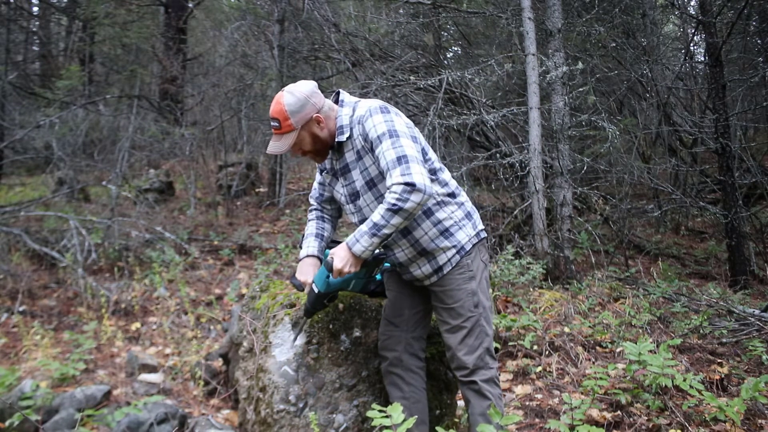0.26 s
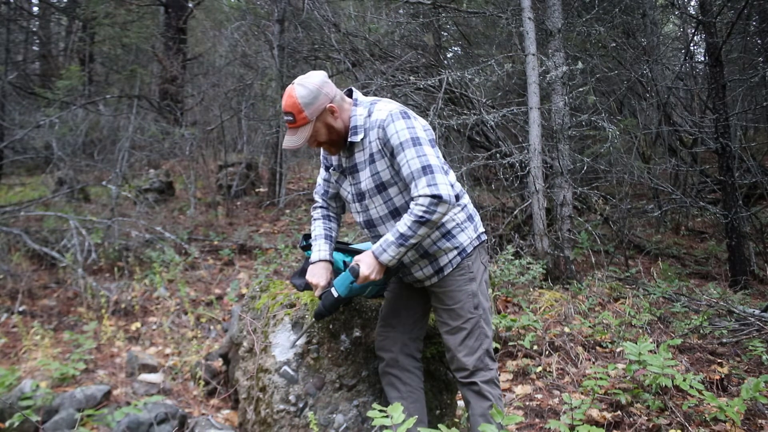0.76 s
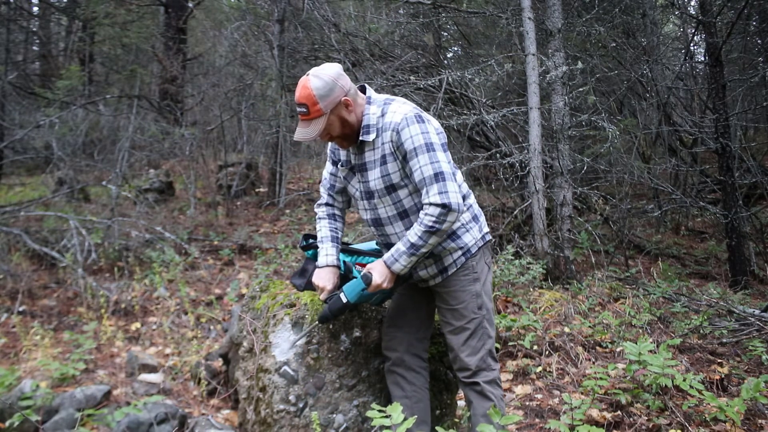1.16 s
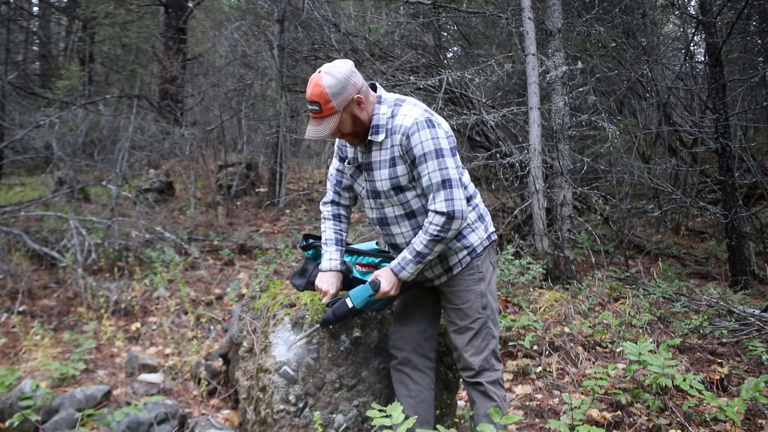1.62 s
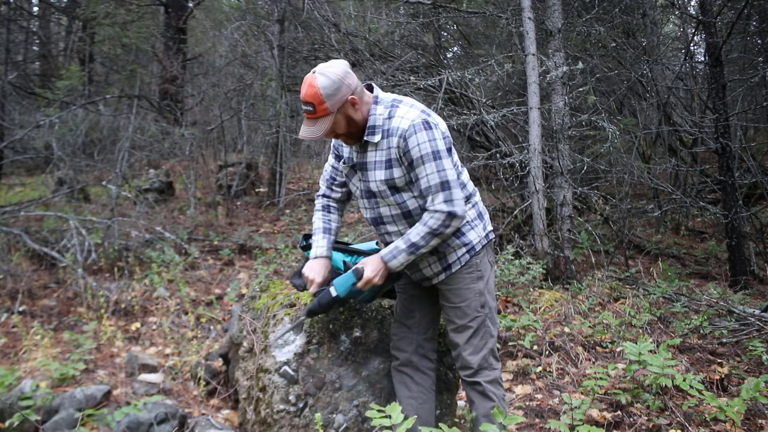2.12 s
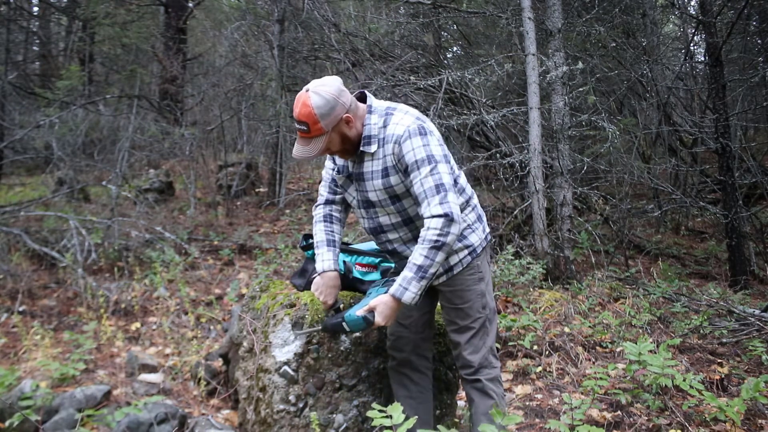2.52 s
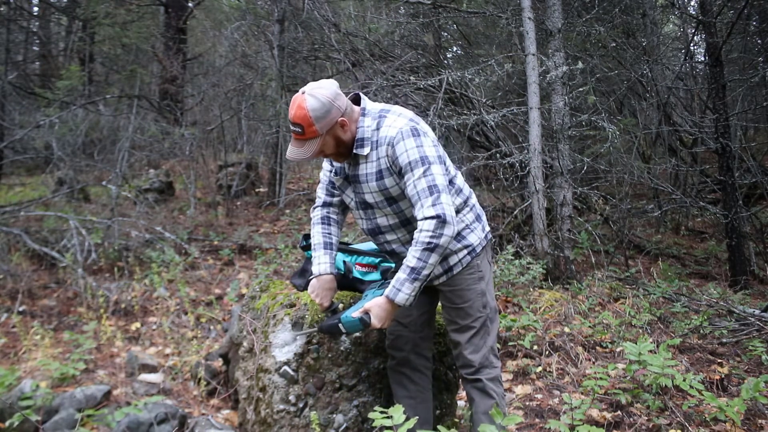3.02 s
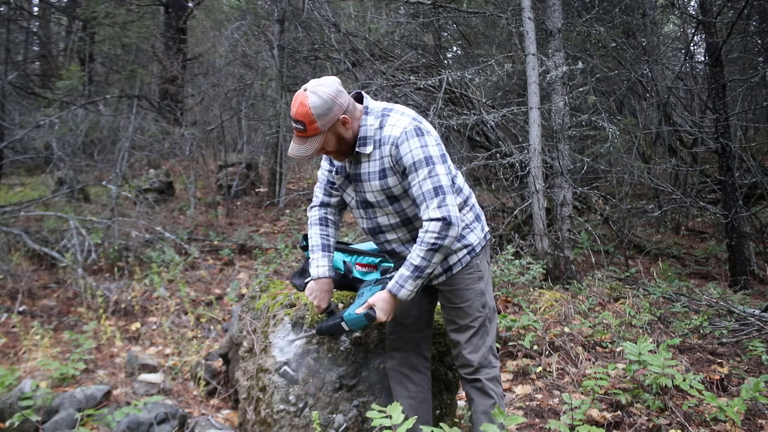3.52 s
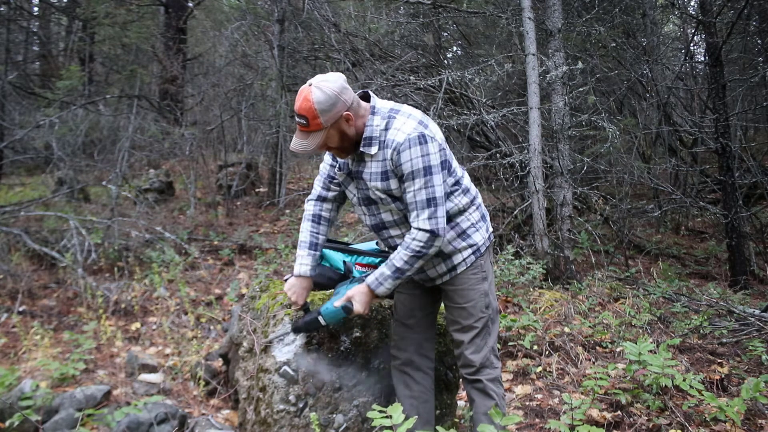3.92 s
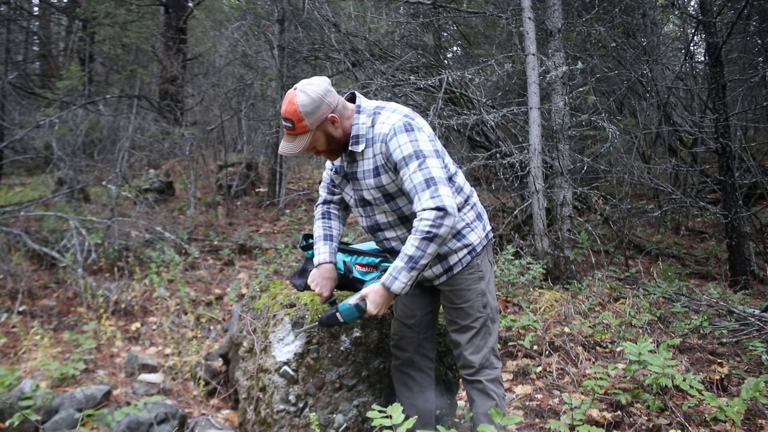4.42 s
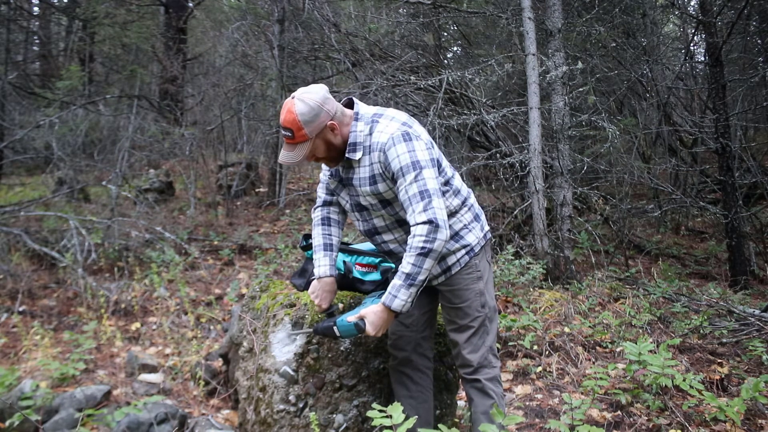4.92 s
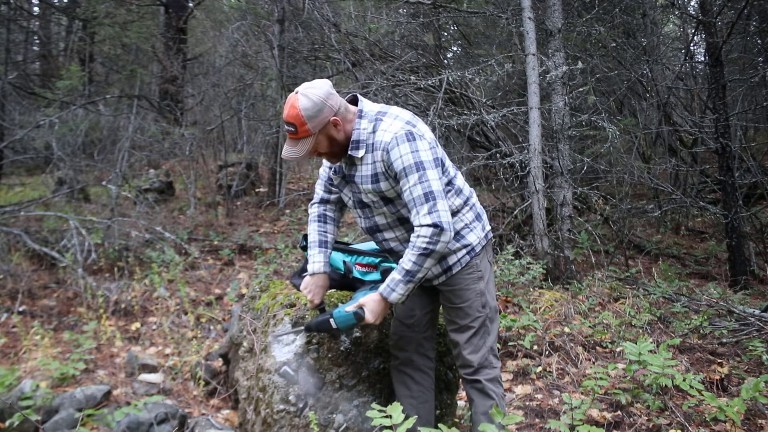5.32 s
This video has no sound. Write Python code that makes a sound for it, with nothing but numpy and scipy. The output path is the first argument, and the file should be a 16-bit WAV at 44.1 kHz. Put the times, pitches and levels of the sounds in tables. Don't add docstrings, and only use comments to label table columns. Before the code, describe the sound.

A cordless rotary hammer chisels old concrete outdoors in three rattling bursts, with chips pattering onto dry leaves in the pauses.

```python
import sys
import numpy as np
from scipy import signal
from scipy.io import wavfile
from scipy.ndimage import uniform_filter1d

SR = 44100
rng = np.random.default_rng(int(sys.argv[2]) if len(sys.argv) > 2 else 0)


def amplitude_ratio(level_db):
    exponent = np.asarray(level_db, float) / 20
    return 10 ** exponent


def put_to_file(sound):
    columns = np.atleast_2d(sound).T
    safe = np.clip(columns, -1, 1)
    whole_steps = np.round(safe * 32767)
    wavfile.write(sys.argv[1], SR, whole_steps.astype(np.int16))


N = 245195

# (centre [Hz], width [Hz], level [dB], extra fade at low speed [dB per dB])
HOUSING_MODES = [(1720, 420, 1, 0), (2550, 650, -3.5, .6), (3650, 600, 1.5, .6)]
# (frequency [Hz], level [dB per Hz])
BLOW_COLOUR = [(80, -106), (300, -17), (800, 7.5), (1500, 4), (3300, 9), (3950, 6), (4500, 1), (9500, -7),
               (11200, -4.5), (14500, -5.5), (16000, -12.5)]
# (frequency [Hz], level [dB], decay time T60 [s])
BIT_MODES = [(12850, -1, .019), (12550, -4, .016), (12150, -9, .014), (11200, -6, .018), (14300, -7, .012),
             (8000, -12, .009)]


def evened(x):
    return x / np.sqrt(np.mean(x ** 2) + 1e-20)


def colour(x, points):
    f, db = np.transpose(points)
    hz = abs(np.fft.fftfreq(4096, 1 / SR))
    log_gain = np.log(amplitude_ratio(np.interp(np.log(hz + 1), np.log(f + 1), db)))
    taps = np.fft.ifft(np.exp(np.conj(signal.hilbert(log_gain)))).real[:2048]
    return signal.oaconvolve(x, taps)[:len(x)]


def band(x, lo_hz, hi_hz):
    return signal.sosfilt(signal.butter(2, [lo_hz, hi_hz], "band", fs=SR, output="sos"), x)


def split(low, high):
    lower, upper = (signal.butter(4, 4500, kind, fs=SR, output="sos") for kind in ("low", "high"))
    return signal.sosfilt(lower, low) + signal.sosfilt(upper, high)


def resonate(x, hz, width):
    turn = np.exp(2j * np.pi * np.cumsum(hz) / SR)
    r = np.exp(-np.pi * width / SR)
    return 2 * (turn * signal.lfilter([1 - r], [1, -r], x / turn)).real


def wander(count, size, span):
    noise = rng.standard_normal((count, size))
    return evened(uniform_filter1d(uniform_filter1d(noise, span), span))


def add(mix, at, sound):
    part = mix[at:at + len(sound)]
    part += sound[:len(part)]


def beats(turns, count, jitter):
    at = np.flatnonzero(np.diff(np.floor(turns * count)) > 0)
    return np.clip(at + jitter * SR * rng.standard_normal(len(at)), 0, N - 1).astype(int)


def knocks(at, t60, fresh, spread_db, drift, spike):
    t, out = np.arange(900) / SR, np.zeros(N)
    shapes = wander(len(t), len(at), drift).T
    shapes = np.sqrt(1 - fresh) * shapes + np.sqrt(fresh) * rng.standard_normal(shapes.shape)
    shapes[:, 28] -= spike
    sizes = amplitude_ratio(spread_db * rng.standard_normal(len(at)))
    envelope = amplitude_ratio(-60 * t / t60) * np.minimum(t / .0008, 1)
    for i, size, shape in zip(at, sizes, shapes):
        add(out, i, size * shape * envelope)
    return evened(out)


def hammer():
    # (time [s], push [dB], blow share [dB], freedom of the bit to sing [dB])
    grip = [
        [(0.0, 4.5, -2.5, 10), (.1, 1.5, -2, 8.5), (.28, -0.5, 0.5, 11.5), (.35, 0, -2.5, 8),
         (.54, 2, -2.5, 12), (.82, -2, -2, -7), (1.07, -2.5, -6, -2), (1.17, -1, -5.5, 7), (1.3, 1.5, -2, 0),
         (1.5, 0, -1.5, -12), (1.74, 1.8, 2, -3), (1.83, 1, -8, 0), (1.95, 1.9, -6, 0)],
        [(2.82, -1.5, 0, 4), (2.842, -4.5, 0, 0), (2.853, 0, 0, 0), (2.88, -4.5, 0, 0), (2.89, 3, 0, 0),
         (2.92, 1, 0, 0), (2.98, -2.5, 0, 0), (3.01, 2.5, 0, 0), (3.1, 1.4, -5, 11), (3.44, 2.8, 0.5, 9),
         (3.5, 0.5, -2, 8), (3.545, 4.5, 0, 5), (3.58, 2.5, 3.5, 4), (3.79, 1, -9, 13), (3.82, -0.1, -5, 4)],
        [(4.48, -1, 4, 0), (4.51, 3, -3, 0), (4.535, -3, 0, 0), (4.55, 0, 3, 0), (4.6, -1, -2, 0),
         (4.7, -0.5, 8, 0), (4.78, 0, -1, 4), (4.83, 3.5, -1, 14), (4.92, -0.5, -2, 9), (4.954, 3, -3, 5),
         (4.985, 0.5, -2.5, 9), (5.19, 3.4, 2.5, 9), (5.31, 3.5, -6, 12), (5.33, 1.7, -1, -6)],
    ]
    t = np.arange(N) / SR
    free, speed_db, load_db, contact_db, lag, loose = trigger(t)
    turns = 82.03 * t - lag
    s, *columns = np.transpose(np.concatenate(grip))
    push_db, share_db, sing_db = (np.interp(t, s, c) for c in columns)
    at = beats(turns, count=1, jitter=.00003)
    seated = contact_db > -6

    clear_db, damp_db = 3.5 * free, -5.5 * (1 - free) * seated
    out = rattle(turns, speed_db + load_db + push_db - 3.5, clear_db, damp_db)
    out = out * amplitude_ratio(-3 * np.maximum(seated, free / 2) * np.sin(np.pi * (turns - .2)) ** 2)

    parts = amplitude_ratio(-25.5 + contact_db + share_db) * blows(at, t)
    parts = parts + amplitude_ratio(-49.5 + 1.5 * contact_db + sing_db) * bit_ring(at)
    shudder_db = -34.5 - 4.5 * free + .58 * (contact_db + 17 * free) + push_db
    parts = parts + amplitude_ratio(shudder_db) * shudder(turns, loose)
    return out + amplitude_ratio(1.4 * speed_db) * parts


def trigger(t):
    # (motor at full speed [s], bit bites [s], bit slips off [s], motor stops [s])
    bursts = [
        (-.5, -.3, 1.78, 2.005),
        (2.872, 3.005, 3.835, 3.939),
        (4.548, 4.78, 5.3, 5.478),
    ]
    crank = [
        (.465, 0, .1, .2),
        (.875, .02, 1, .55),
        (.775, .225, .12, .33),
    ]
    burst_rattle = [-23.5, -23, -23]
    full, bite, slip, stop = np.transpose(bursts)
    which = np.searchsorted((stop[:-1] + full[1:]) / 2, t)
    full, bite, slip, stop = (t - s[which] for s in (full, bite, slip, stop))
    phase, stall, free, seated = np.transpose(crank)[:, which]
    bitten = np.clip(bite / .0105, 0, 1)
    off = np.maximum(slip, 0)

    spin_up_db_per_s, brake_db_per_s2 = 361, 26000
    speed_db = spin_up_db_per_s * np.minimum(full, 0) - brake_db_per_s2 * np.clip(stop, 0, 1) ** 2
    load_db = np.take(burst_rattle, which) + 4 * np.exp(-abs(full) / .23)
    load_db = load_db + 3.5 * (1 - bitten) - 20 * off
    contact_db = -17 * (1 - bitten) + np.maximum(-179 * off, -26)

    race_turns, race_s, stall_s, coast_turns_per_s = .47, .056, .07, .9
    race = np.minimum(race_turns * np.exp(-np.maximum(full, -1) / race_s), 2 * race_turns)
    lag = phase + race + stall * (1 - np.exp(-np.maximum(bite, 0) / stall_s)) - coast_turns_per_s * off
    settling = np.maximum(1 - bite / .09, seated)
    loose = np.where((slip > 0) | (full < 0), 1, np.where(bite < 0, free, settling))
    lag, loose = (uniform_filter1d(x, size=1200) for x in (lag, loose))
    return 1 - bitten, speed_db, load_db, contact_db, lag, loose


def blows(at, t):
    # (time [s], lower ring [Hz],
    # upper ring [Hz], top ring [Hz], lower level [dB], upper level [dB], top level [dB])
    seat_rings = [
        [(0, 2120, 3780, 7860, -21, 9.5, 4), (.13, 1980, 3620, 7800, -9, 11, 9),
         (.22, 1930, 3570, 6300, -9, 9.5, -13), (.42, 2070, 3870, 5430, -3, 8, 14),
         (.68, 2280, 3720, 5500, -1, 9, 11), (.76, 2100, 3250, 8200, 0, 7, 11),
         (.88, 2230, 3420, 8270, 1, 5.5, 12), (1.0, 2130, 3500, 6240, 5, 9.5, 11),
         (1.22, 2160, 3240, 6050, -1, 11, 10), (1.3, 2100, 3180, 8400, -5, 1, 8),
         (1.45, 2240, 3160, 8300, 0, 2, 6), (1.52, 3200, 3650, 6000, -21, 6, -8),
         (1.78, 3200, 3700, 7800, -19, 0.5, -10)],
        [(3.0, 2470, 3630, 6030, 3, -13, -3), (3.08, 2450, 3530, 6170, 7, 1, -12),
         (3.19, 2330, 3800, 6840, -1, -5, 0), (3.32, 2200, 3620, 7850, -4.5, -5, -6),
         (3.6, 2330, 3940, 7900, -12, -0.5, 11), (3.75, 2140, 3750, 6200, -6, 3.5, -14),
         (3.9, 2300, 3630, 6240, 14, -21, -7)],
        [(4.78, 2420, 3600, 6300, 8.5, -13, -6), (4.84, 2420, 3630, 5900, 3, 1, -10),
         (4.99, 2300, 3800, 7900, 2.5, 0, 6), (5.06, 2460, 3820, 7900, -8, 9, 12),
         (5.2, 2300, 3750, 8350, -21, -10, 12), (5.3, 2350, 3480, 6160, 2, -2, -2),
         (5.4, 2300, 3440, 5900, -12, -1, -2)],
    ]
    drive = knocks(at, t60=.011, fresh=.09, spread_db=.7, drift=26, spike=-10)
    drive[58:] += .2 * drive[:-58]
    splash = knocks(at, t60=.019, fresh=.35, spread_db=2.5, drift=14, spike=6)
    s, *columns = np.transpose(np.concatenate(seat_rings))
    low_hz, high_hz, top_hz, low_db, high_db, top_db = (np.interp(t, s, c) for c in columns)
    lower = amplitude_ratio(low_db) * evened(resonate(drive, low_hz, width=420))
    upper = amplitude_ratio(high_db) * evened(resonate(drive, high_hz, width=520))
    top = amplitude_ratio(top_db - 19) * evened(band(resonate(drive, top_hz, width=350), 4500, 10000))
    knock = evened(colour(split(drive, 1.6 * splash), BLOW_COLOUR))
    return evened(knock + amplitude_ratio(-1) * band(lower - upper, 1400, 4600) + top)


def rattle(turns, level_db, clear_db, damp_db):
    # (frequency [Hz], level [dB per Hz])
    clatter_colour = [(80, -105), (250, -11), (500, -11), (750, -4.5), (1100, 0), (2600, 4.5), (3900, 0),
                      (4500, -8), (8000, -8.5), (11000, -18), (12800, -14), (16000, -32)]
    slack_db = np.minimum(level_db + 29, 0)
    at = beats(turns, count=2, jitter=.00007)

    def slaps():
        ring = knocks(at, t60=.015, fresh=.3, spread_db=1.5, drift=20, spike=4)
        return ring + amplitude_ratio(-4.5) * rng.standard_normal(N)

    inner, outer = slaps(), slaps()
    hiss = evened(outer + amplitude_ratio(2) * rng.standard_normal(N))
    hiss = hiss * amplitude_ratio(-1 + .27 * np.minimum(level_db + 31.5, 0))
    outer = split(evened(outer), hiss)
    modes = np.zeros(N)
    for hz, w, db, fade in HOUSING_MODES:
        mode = band(band(inner, hz - w / 2, hz + w / 2), hz - w, hz + w)
        modes += amplitude_ratio(db + fade * slack_db + (fade == 0) * damp_db) * evened(mode)
    clatter = amplitude_ratio(-2.5 - clear_db / 2 + .9 * slack_db) * evened(colour(outer, clatter_colour))
    return amplitude_ratio(level_db) * (amplitude_ratio(clear_db / 2 - 9.5) * modes + clatter)


def shudder(turns, loose):
    # (multiple of the crank rate, held lightly [dB], leaned on [dB], running free [dB])
    multiples = [(1, -29.5, -28, -24.5), (2, -23, -17, -23), (3, -3.5, -13.5, -20.5), (4, -3.5, -7, -7),
                 (5, -3.5, -11.5, -7), (6, -41, -10.5, -5), (7, 0, -2, -4.5), (8, 2.5, -3, -3),
                 (9, -4, -7, -22), (10, 4.5, -0.5, 1.5), (11, 3, -2, -24), (12, -44, -2, -18),
                 (13, 9, -2.5, -5), (14, -29, -3, -24), (15, 4.5, -3, -26), (16, -54, -26, -31),
                 (17, 5, -2, -25), (18, -45, -23, -20), (19, 6, 0, -33), (20, 8.5, -38, -23),
                 (21, -3, 1.5, -14)]
    # (from [s], to [s], column of the multiples)
    spells = [
        (0, 2.4, 1),
        (2.4, 3.0, 3),
        (3.0, 4.2, 2),
        (4.2, 4.78, 3),
        (4.78, 5.6, 2),
    ]
    out, t = np.zeros(N), np.arange(N) / SR
    for start, end, column in spells:
        k, db = np.transpose(multiples)[[0, column], :, None]
        k = np.round(k)
        now = (t >= start) & (t < end)
        slow = wander(2 * len(k), now.sum() // 20 + 1, span=90)
        slow = np.repeat(slow, 20, axis=1)[:, :now.sum()]
        lag = .07 * k + .09 * rng.standard_normal(k.shape) + .28 * loose[now] * slow[1::2]
        swell_db = 3.5 * loose[now] * slow[::2]
        waves = amplitude_ratio(db + swell_db) * np.cos(2 * np.pi * (k * turns[now] - lag))
        out[now] = evened(waves.sum(0))
    return out


def bit_ring(at):
    t, out = np.arange(1500) / SR, np.zeros(N)
    for hz, db, t60 in BIT_MODES:
        swell_db = 2 * wander(1, len(at), span=9)[0] + 3.5 * rng.standard_normal(len(at))
        sizes = amplitude_ratio(db + swell_db)
        tunes = 1 + .003 * wander(1, len(at), span=12)[0] + .003 * rng.standard_normal(len(at))
        fade = amplitude_ratio(-60 * t / t60) * np.minimum(t / .0012, 1) ** 2
        for i, size, tune in zip(at, sizes, tunes):
            add(out, i, size * fade * np.sin(2 * np.pi * hz * tune * t))
    return evened(out)


def sings():
    # (time [s], peak level [dB])
    free_rings = [(0.0548, -31), (0.0797, -30), (0.0922, -23), (0.1765, -31), (0.189, -27), (0.5053, -32),
                  (0.5551, -23), (1.481, -34), (1.6033, -30), (1.7005, -31), (1.7125, -24), (1.7604, -30),
                  (1.7739, -16.5), (1.8098, -28), (1.8477, -30), (1.8592, -25), (2.9976, -35),
                  (3.0579, -32), (3.0719, -30), (3.2545, -26), (3.3029, -31), (3.3154, -26), (3.3767, -29),
                  (3.4002, -21), (3.5229, -26), (3.5349, -18), (3.693, -26), (3.717, -29), (3.7414, -20),
                  (3.7793, -23), (3.7904, -27), (3.8312, -28), (3.8674, -35), (4.7646, -37), (4.778, -29),
                  (4.7905, -29), (4.8145, -27), (4.8269, -21), (4.8509, -29), (4.8758, -21), (4.888, -22),
                  (4.9252, -26), (4.9377, -14), (4.9496, -14), (4.962, -16), (4.998, -27), (5.01, -24),
                  (5.0828, -29), (5.254, -32), (5.2924, -18), (5.3044, -20), (5.3527, -27), (5.3644, -33)]
    out, t = np.zeros(N), np.arange(1500) / SR
    fade = amplitude_ratio(.5 - 60 * t / .022) * np.minimum(t / .0012, 1)
    for (s, db), (tune, side) in zip(free_rings, rng.standard_normal((len(free_rings), 2))):
        hz = BIT_MODES[0][0] * (1 + .004 * tune)
        tone = np.sin(2 * np.pi * hz * t) + .35 * np.sin(2 * np.pi * (hz + 250 * side) * t)
        add(out, round(s * SR), amplitude_ratio(db) * fade * tone)
    return out


def cracks():
    # (time [s], peak level [dB])
    cracking_blows = [(1.723, -10.5), (1.785, -17), (1.811, -13.5), (1.861, -20), (1.8697, -10),
                      (2.884, -25), (2.9422, -12), (2.9484, -17), (3.044, -15), (3.058, -10), (3.068, -15),
                      (3.082, -15), (3.266, -10.5), (3.5353, -10), (3.7648, -12.5), (3.7896, -11),
                      (4.5434, -18), (4.5497, -31), (4.5604, -30), (4.629, -15), (4.7876, -21),
                      (4.799, -12), (4.8231, -11), (4.849, -11), (4.861, -17), (5.364, -14), (5.379, -13)]
    out, i = np.zeros(N), np.arange(600)
    fade = amplitude_ratio(-60 * i / SR / .012) * np.minimum(i / 40, 1) ** 2
    for s, db in cracking_blows:
        snap = rng.standard_normal(600) * fade - 2 * (i == 40)
        add(out, round(s * SR), amplitude_ratio(db - 13.5) * evened(band(colour(snap, BLOW_COLOUR), 500, 7500)))
    return out


def thumps():
    # (time [s], peak level [dB])
    heavy_blows = [(1.811, -17), (1.868, -16), (3.009, -11), (3.02, -16), (3.043, -14), (3.056, -18),
                   (3.07, -28), (3.081, -30), (3.117, -7), (3.131, -28), (3.265, -18), (3.3, -14),
                   (3.534, -16), (3.545, -18), (3.558, -14), (3.763, -16), (3.789, -9), (3.801, -10),
                   (3.827, -17), (3.837, -16), (4.789, -18), (4.799, -11), (4.812, -17), (4.824, -14),
                   (4.836, -10), (4.849, -9), (4.86, -15), (4.884, -16), (4.896, -11), (4.922, -19),
                   (4.947, -15), (5.301, -17), (5.311, -18), (5.364, -18), (5.377, -37)]
    slab_hz, t60_s, top_db = 950, .018, -18
    out, t = np.zeros(N), np.arange(1200) / SR
    for (s, db), noise in zip(heavy_blows, rng.standard_normal((len(heavy_blows), len(t)))):
        noise = noise * amplitude_ratio(-60 * t / t60_s) - 8 * (t == t[20])
        knock = band(band(noise, slab_hz / 2, slab_hz * 2), 450, 3000)
        add(out, round(s * SR), amplitude_ratio(min(db, top_db) - 4) * knock / abs(knock).max())
    return out


def catches():
    # (time [s], peak level [dB])
    lone_slaps = [
        (2.006, -34),
        (3.941, -22),
        (3.953, -41),
        (4.458, -35),
        (4.4802, -27),
    ]
    out, t = np.zeros(N), np.arange(1500) / SR
    tone = np.minimum(t / .0013, 1) * np.sin(2 * np.pi * HOUSING_MODES[0][0] * t)
    for s, db in lone_slaps:
        add(out, round(s * SR), amplitude_ratio(db - 60 * t / .026) * tone)
    return out


def chips():
    # (time [s], peak level [dB], centre [Hz], bright part [dB])
    falls = [(2.174, -43, 1510, -12), (2.18, -44.5, 690, -7), (2.191, -32.5, 4070, -3),
             (2.2, -40, 1640, -18), (2.225, -42.5, 3210, -2), (2.245, -49, 1080, -23),
             (2.287, -30.5, 3200, -14), (2.289, -38, 810, -14), (2.36, -45, 748, -17),
             (2.375, -43, 597.4, -13), (2.394, -38, 2220, -32), (2.412, -41, 1290, -28),
             (2.431, -47, 1100, -26), (2.473, -39, 815, -15), (2.58, -47, 1310, -21),
             (2.683, -55, 697, -12), (2.703, -49, 1700, -6), (2.711, -38, 1780, -47),
             (2.734, -37, 1900, -16), (2.749, -51, 2500, -2), (4.046, -51, 1500, -3), (4.171, -50, 594, -4),
             (4.194, -36.5, 1500, -18), (4.2, -36, 970, -25), (4.1996, -30.5, 2640, -25),
             (4.214, -52, 3180, -26), (4.263, -49, 1230, -7), (4.3, -43.5, 2950, -4), (4.318, -51, 3900, 6),
             (5.526, -48, 3000, 2), (2.11, -50, 2500, 0), (2.33, -56, 2500, -4), (2.564, -55, 3600, -12),
             (2.588, -51, 3500, -14), (2.666, -57, 3500, -2), (2.771, -54, 3500, -7),
             (2.791, -48, 2800, -10), (4.01, -48, 3500, 1), (4.027, -51, 3800, 1), (4.063, -49, 3500, 0),
             (4.091, -49, 2500, -2), (4.132, -59, 3500, 7), (4.228, -45, 3700, -20), (4.381, -59, 3500, -1),
             (4.398, -58, 3500, -6), (5.553, -44, 3000, -2)]
    out, t = np.zeros(N), np.arange(3000) / SR
    when, size, pitch, shine = rng.random((200, 4)).T
    grit_s = np.cumsum(.5 + when) / 16
    grit = np.c_[grit_s, -57 + 4 * (2 * size - 1), 600 * 3 ** pitch, -18 * shine]
    noise = rng.standard_normal((230, 2, len(t)))
    snap = 1 + amplitude_ratio(-4) * np.exp(-t / .0028)
    for (s, db, hz, bright_db), (dull, bright) in zip([*falls, *grit[grit_s < N / SR]], noise):
        t60 = .077 * (1000 / hz)
        tap = evened(band(band(dull, hz / 1.73, min(hz * 1.68, 4200)), 250, 5000)) * amplitude_ratio(-60 * t / t60)
        tick = evened(band(bright, 4500, 11500)) * amplitude_ratio(bright_db - 60 * t / (.4 * t60))
        add(out, round(s * SR), amplitude_ratio(db - 8) * snap * (tap + tick))
    return out


def trunks(x):
    t = np.arange(SR // 3) / SR
    sparse = rng.standard_normal(len(t)) * (rng.random(len(t)) < .05)
    tail = band(sparse, 356, 6300) * amplitude_ratio(-60 * t / .11) * (t > .008)
    tail *= amplitude_ratio(-17.5) / np.linalg.norm(tail)
    tail[[0, 70]] = 1, .12
    return signal.oaconvolve(x, tail)[:N]


def woods():
    # (frequency [Hz], level [dB per Hz])
    leaf_colour = [(15, -25), (30, -8), (90, -2.5), (250, -3.5), (450, 1), (1000, -0.5), (2000, -9),
                   (3900, -9), (4600, -19), (9000, -22.5), (16000, -22)]
    # (time [s], level [dB])
    rustle = [
        (0.0, -52),
        (1.2, -65.5),
        (2.05, -60.5),
        (2.41, -59),
        (2.78, -54),
        (3.99, -59.5),
        (4.26, -59.5),
        (4.45, -57),
        (5.5, -58.5),
    ]
    z = signal.stft(rng.standard_normal(N), SR, nperseg=512)[2]
    patches = uniform_filter1d(uniform_filter1d(rng.standard_normal(z.shape), 10, 0), 8, 1)
    air = signal.istft(z * amplitude_ratio(2 * evened(patches)), SR, nperseg=512)[1][:N]
    crackle = amplitude_ratio(8 * np.minimum(rng.exponential(1, N), 3.5))
    crackle = crackle * (rng.random(N) < 300 / SR) * rng.choice([-1, 1], N)
    s, db = np.transpose(rustle)
    level = amplitude_ratio(np.interp(np.arange(N) / SR, s, db) + 1.5)
    return level * evened(colour(evened(air) + .35 * evened(crackle), leaf_colour))


def scene():
    near = hammer() + catches() + sings() + thumps() + cracks() + chips()
    return (trunks(near) + woods())[None]


def roll_off(x):
    return signal.sosfilt(signal.butter(12, 16500, fs=SR, output="sos"), x)


def record(dry):
    edge = signal.firwin(301, 15700, window=("kaiser", 8), fs=SR)
    return roll_off(signal.oaconvolve(dry, edge[None], "same"))


dry = scene()
out = record(dry)
put_to_file(out)
```